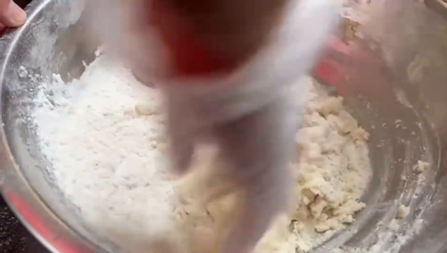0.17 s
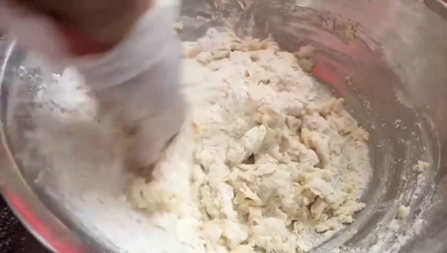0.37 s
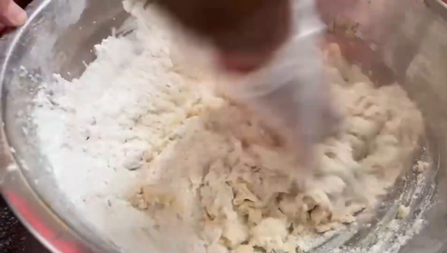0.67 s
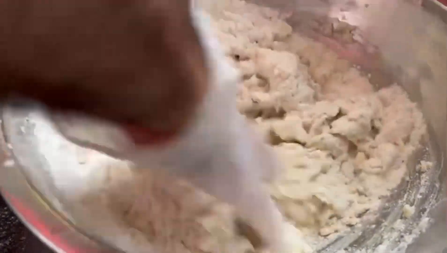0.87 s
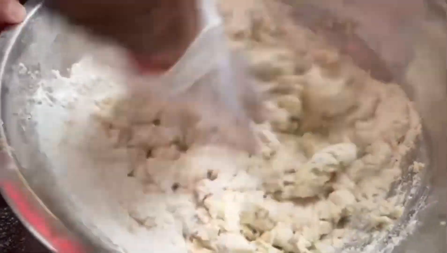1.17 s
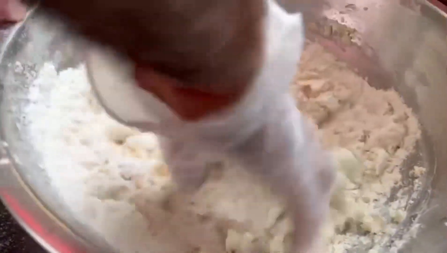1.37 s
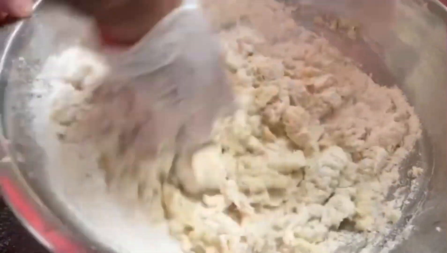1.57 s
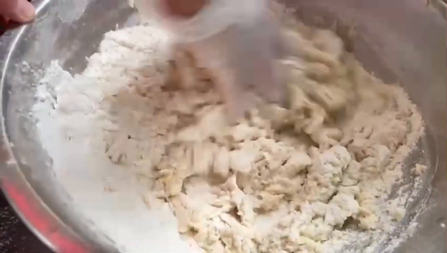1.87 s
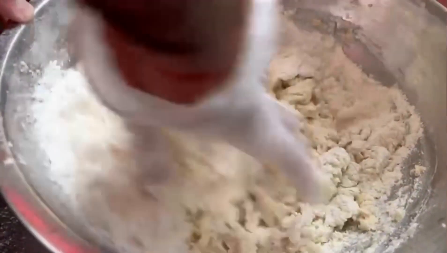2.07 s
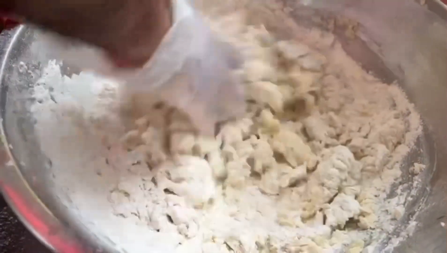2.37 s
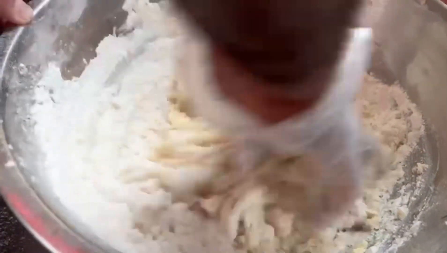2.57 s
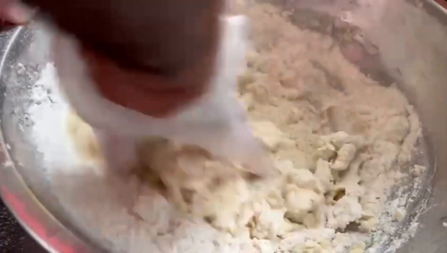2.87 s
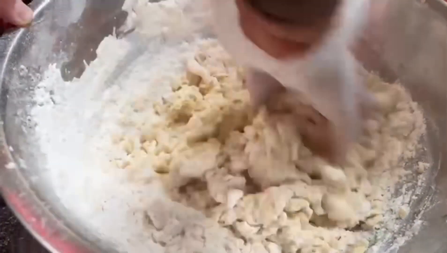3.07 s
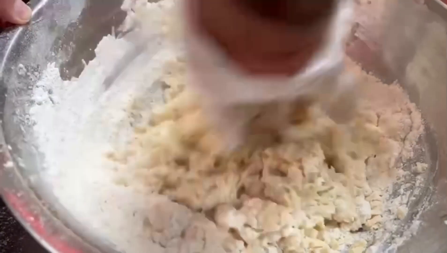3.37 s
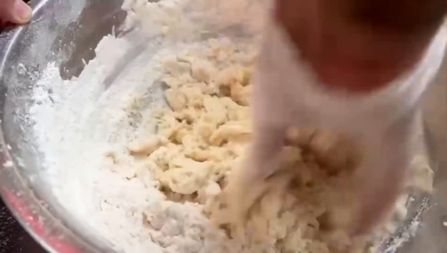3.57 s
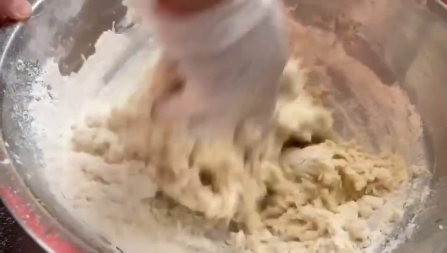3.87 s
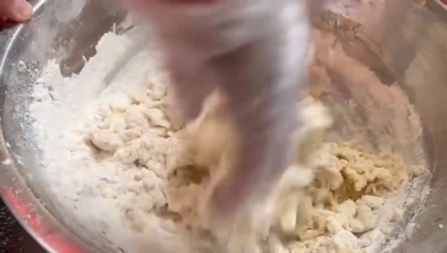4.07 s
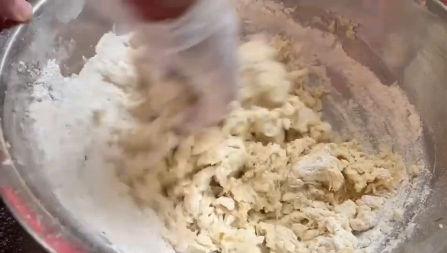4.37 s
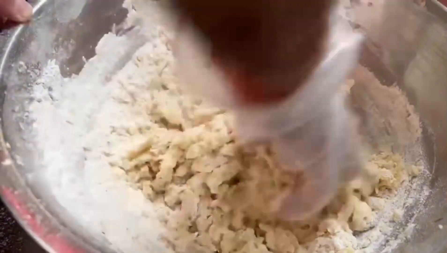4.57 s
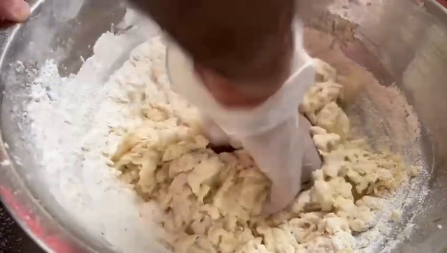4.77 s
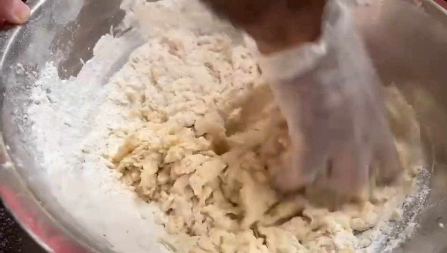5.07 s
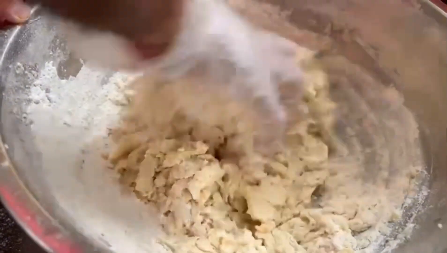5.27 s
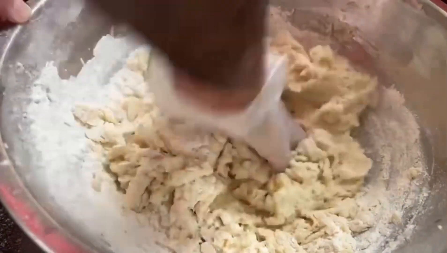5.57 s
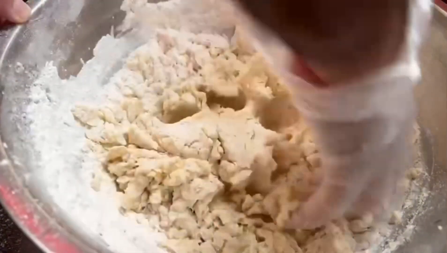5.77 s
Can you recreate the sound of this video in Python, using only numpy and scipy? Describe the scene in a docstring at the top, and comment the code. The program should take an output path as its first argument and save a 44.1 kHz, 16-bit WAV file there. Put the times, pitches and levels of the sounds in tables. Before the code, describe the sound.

A gloved hand mixes dough and flour in a steel bowl, with irregular rubbing, scraping and dull knocks over a faint hum.

```python
"""A gloved hand stirs flour and dough crumbs round a steel bowl, heard close up in stereo.
It opens on light touches and two tiny glove squeaks. From 0.7 s the fingers dig in, dragging lumps over
the wall; the damped steel taps and rings, and knuckles knock hard at 1.3 and 1.65 s. The stirring
goes on in a hiss of flour, lulls just after 4 s, then returns for a last run of strokes and knocks.
Mains hum and kitchen room tone lie underneath throughout."""
import sys
import numpy as np
from scipy import signal
from scipy.fft import rfft, irfft, next_fast_len
from scipy.io import wavfile
from scipy.ndimage import uniform_filter1d

SR = 44100
rng = np.random.default_rng(int(sys.argv[2]) if len(sys.argv) > 2 else 0)


def persist_wave(psi):
    """Save psi, clipped to +-1, as 16-bit WAV."""
    counts = np.round(np.clip(psi, -1, 1) * 32767).astype(np.int16)
    wavfile.write(sys.argv[1], SR, np.atleast_2d(counts).T)


N = 260190
STEP = 4  # rubbed modes ring at a quarter of the sample rate

# the bowl's modes in five groups, low to high: pitch_hz, rubbed_db, knocked_db, t60_s
SWAY_MODES = [(165, 0, -20, .35)]
BODY_MODES = [(226, -5, -6, .17), (258, -9, -20, .05), (298, 0, 0, .11), (345, -5, -14, .07)]
BELLY_MODES = [(462, 2, -13, .2), (519, -1, -20, .35), (594, -4, -24, .2)]
WALL_MODES = [(700, -8, -24, .07), (740, -1, -22, .1), (793, -4, -22, .35), (850, -14, -28, .05),
              (928, 2, -24, .12), (975, 2, -26, .09), (1040, 0, -26, .08)]
RIM_MODES = [(1150, -5, -34, .07), (1358, -1, -30, .04), (1506, 0, -31, .035), (1620, -1, -33, .03),
             (1795, -1, -30, .04), (2000, 2, -30, .045), (2070, -5, -32, .035), (2290, -10, -36, .02),
             (2530, -13, -38, .02), (3080, -11, -40, .02), (3600, -17, -40, .012)]
BOWL_MODES = SWAY_MODES + BODY_MODES + BELLY_MODES + WALL_MODES + RIM_MODES
# finger strokes over the wall: start_s, rise_s, hold_s, push_db, scrape_db, grit_db, jolt_db
FINGER_STROKES = [(0.179, 0.0031, 0.0061, -45, -86, -90, -47.5), (0.3, 0.039, 0.0091, -47, -56, -61.5, -79),
                  (0.686, 0.018, 0.0068, -35.5, -49, -59, -37), (0.805, 0.025, 0.011, -29, -30, -44, -28.5),
                  (0.877, 0.038, 0.092, -21, -23, -33.5, -60), (1.028, 0.03, 0.076, -20.5, -22.5, -36, -56),
                  (1.139, 0.049, 0.027, -25, -22.5, -39.5, -60),
                  (1.204, 0.041, 0.0021, -23.5, -18.5, -27, -47),
                  (1.305, 0.013, 0.008, -20.5, -23.5, -31.5, -58),
                  (1.421, 0.019, 0.022, -25.5, -27, -42.5, -60),
                  (1.526, 0.017, 0.0063, -29, -29.5, -41, -35.5), (1.59, 0.03, 0.035, -40, -39, -45.5, -60),
                  (1.646, 0.021, 0.0064, -22.5, -30, -35, -60), (1.754, 0.031, 0.041, -24, -27.5, -43, -56),
                  (1.812, 0.0037, 0.029, -24.5, -44, -61, -60),
                  (1.989, 0.022, 0.0062, -23.5, -27.5, -42.5, -24.5),
                  (2.135, 0.025, 0.012, -31.5, -39.5, -52.5, -54),
                  (2.286, 0.026, 0.057, -26, -43, -51, -32.5), (2.388, 0.07, 0.037, -28.5, -38, -51.5, -63),
                  (2.46, 0.028, 0.011, -25, -27.5, -42, -38), (2.554, 0.036, 0.033, -26.5, -32.5, -44, -52),
                  (2.741, 0.027, 0.037, -26.5, -33, -45, -30),
                  (2.795, 0.048, 0.035, -23.5, -33.5, -44.5, -60),
                  (2.908, 0.085, 0.013, -29.5, -27.5, -41, -60),
                  (3.029, 0.015, 0.015, -27, -31.5, -45.5, -60),
                  (3.157, 0.022, 0.091, -24, -31.5, -46, -38), (3.223, 0.02, 0.096, -39, -36, -49.5, -60),
                  (3.345, 0.05, 0.012, -24, -38.5, -46.5, -43),
                  (3.414, 0.019, 0.0096, -28.5, -38, -50.5, -65), (3.53, 0.046, 0.058, -41, -51, -69, -66),
                  (3.67, 0.025, 0.013, -26, -34, -48.5, -62),
                  (3.821, 0.03, 0.012, -21.5, -27.5, -36.5, -22),
                  (3.936, 0.032, 0.02, -50, -45.5, -64, -46), (3.965, 0.017, 0.081, -46.5, -54, -64.5, -73),
                  (4.018, 0.045, 0.011, -34.5, -48, -68, -85),
                  (4.146, 0.018, 0.063, -50.5, -62.5, -76, -81),
                  (4.536, 0.009, 0.083, -46, -55.5, -67.5, -74),
                  (4.665, 0.026, 0.022, -27, -34.5, -49, -51),
                  (4.703, 0.014, 0.0095, -20.5, -29, -41.5, -28),
                  (4.797, 0.0055, 0.023, -28, -33.5, -43.5, -57),
                  (4.855, 0.013, 0.025, -34.5, -50, -47, -63),
                  (4.897, 0.0061, 0.0094, -32, -33.5, -52, -36),
                  (5.071, 0.048, 0.0057, -28.5, -59, -56, -32.5),
                  (5.118, 0.049, 0.028, -39.5, -43.5, -62, -57),
                  (5.26, 0.051, 0.016, -24.5, -38.5, -43.5, -61),
                  (5.318, 0.017, 0.11, -49, -45.5, -65, -60),
                  (5.462, 0.015, 0.073, -34.5, -45.5, -57.5, -39),
                  (5.62, 0.019, 0.042, -25.5, -48, -48, -27),
                  (5.69, 0.013, 0.027, -35.5, -48.5, -53.5, -77)]


def rubbing():
    """Fingers drag dough round the bowl: push moves the low modes, scrape the wall, grit the rim."""
    # the counter under the bowl: pitch_hz, rubbed_db, knocked_db, t60_s
    counter_modes = [(69, 0, 0, 0.046)]
    jolt = jolts()
    force = stroke_force(push=1, fall_db_per_s=313, rest_db=-102) + amp(-7) * jolt
    out = stick_slip(force, BODY_MODES, wander_db=5, bend=0.02, top_hz=412,
                     place_db=hand_position_db(BODY_MODES, column=1, log_spread=0.23))
    force = stroke_force(push=1, gain_db=-26.5, fall_db_per_s=200, rest_db=-53.5)
    out += stick_slip(force, counter_modes, wander_db=0, bend=0.059, top_hz=200)
    force = stroke_force(push=1, gain_db=-14, fall_db_per_s=91, rest_db=-85)
    out += stick_slip(force, SWAY_MODES, wander_db=0, bend=0.0092, top_hz=310)
    force = stroke_force(push=0.85, scrape=0.3, gain_db=-7.5, fall_db_per_s=306, rest_db=-63.5)
    out += stick_slip(force + amp(-2.5) * jolt, BELLY_MODES, wander_db=8.3, bend=0.0097, top_hz=696)
    force = stroke_force(scrape=1, fall_db_per_s=320, rest_db=-77) + amp(-2) * jolt
    out += stick_slip(force, WALL_MODES, wander_db=4, bend=0.011, top_hz=984,
                      place_db=hand_position_db(WALL_MODES, column=2, log_spread=0.15))
    force = stroke_force(grit=1, fall_db_per_s=277, rest_db=-97) + amp(-19.5) * jolt
    return out + stick_slip(force, RIM_MODES, wander_db=4, bend=0.006, top_hz=3800)


def stick_slip(force, modes, wander_db, bend, top_hz, place_db=0):
    """Lumps stick and slip, ringing the modes with bumpy noise. The moving hand trades level among them,
    shifting dough bends their pitch, and the soft contact leaves little above top_hz."""
    force = (force * amp(1.58 * drift(20) + 1.05 * drift(150)))[::STEP]
    friction = force * rng.standard_normal((2, len(force)))
    shares = np.array([amp(db + wander_db * drift(8)[::STEP]) for _, db, _, _ in modes]) * amp(place_db)
    shares /= np.linalg.norm(shares, axis=0)
    ring = 0
    for (hz, _, _, t60), share in zip(modes, shares):
        pole = np.exp(-np.log(1000) / t60 * STEP / SR)
        bent_hz = hz * (1 + bend * drift(3.65)[::STEP])
        carrier = np.exp(2j * np.pi * np.cumsum(bent_hz) * STEP / SR)
        envelope = signal.lfilter([np.sqrt(2 - 2 * pole * pole)], [1, -pole], friction * share / carrier)
        ring = ring + (carrier * envelope).real
    ring = signal.sosfilt(signal.butter(3, top_hz, fs=SR / STEP, output="sos"), ring)
    # even out the loudest chance swells of the noisy ringing
    ring_power, force_power = (uniform_filter1d(x ** 2, size=400) + 1e-12 for x in (ring[0], force))
    ring *= np.minimum(force_power / ring_power, 1) ** 0.062
    return signal.resample_poly(ring, STEP, 1, axis=1)[:, :N]


def stroke_force(fall_db_per_s, rest_db, push=0, scrape=0, grit=0, gain_db=0):
    """Each stroke rises, holds and releases; push, scrape and grit weight its three levels."""
    rise_db = 11.5  # a stroke starts this far under its full force
    t = np.arange(0, N / SR + .002, .001)
    power = amp(rest_db) ** 2
    for start, rise, hold, push_db, scrape_db, grit_db, _ in FINGER_STROKES:
        rise = max(rise, .004)
        full_db = (push * push_db + scrape * scrape_db + grit * grit_db) / (push + scrape + grit)
        past_peak_s = t - start - rise
        under_db = np.maximum(-rise_db * past_peak_s / rise, fall_db_per_s * (past_peak_s - hold))
        power = power + amp(full_db + gain_db - np.maximum(under_db, 0)) ** 2
    return np.interp(np.arange(N) / SR, t, np.sqrt(power))


def jolts():
    """The fingers catch a lump as each stroke starts: a kick of force that fades fast."""
    out, t = np.zeros(N), np.arange(SR // 4) / SR
    for start, *_, jolt_db in FINGER_STROKES:
        add(out, start, amp(jolt_db) * np.exp(-t / 0.011) * attack(t, .001))
    return out


def hand_position_db(modes, column, log_spread):
    """Where the hand bears on the bowl decides which modes answer best; the rest lose up to 10.5 dB."""
    # pitches favoured as the hand travels: time_s, body_hz, wall_hz
    hand_path = [(0.66, 244, 730), (0.83, 270, 800), (0.89, 228, 804), (0.98, 282, 880), (1.05, 252, 770),
                 (1.25, 293, 910), (1.31, 265, 726), (1.46, 229, 747), (1.58, 280, 700), (1.76, 276, 960),
                 (1.95, 250, 715), (1.97, 308, 859), (2.05, 306, 815), (2.09, 236, 834), (2.15, 300, 780),
                 (2.26, 266, 726), (2.32, 310, 738), (2.41, 244, 745), (2.47, 280, 880), (2.54, 244, 780),
                 (2.61, 292, 780), (2.68, 262, 744), (2.84, 300, 750), (2.89, 270, 865), (3.06, 275, 725),
                 (3.16, 223, 760), (3.25, 287, 830), (3.54, 261, 710), (3.75, 290, 776), (3.78, 242, 724),
                 (3.85, 299, 801), (3.91, 302, 680), (3.98, 227, 780), (4.1, 231, 710), (4.48, 238, 828),
                 (4.53, 293, 744), (4.94, 330, 830), (5.03, 260, 790), (5.13, 283, 720), (5.23, 225, 786),
                 (5.29, 278, 750), (5.54, 240, 820), (5.57, 260, 740), (5.85, 233, 784)]
    path = np.array(hand_path)
    near_hz = np.interp(np.arange(0, N, STEP) / SR, path[:, 0], path[:, column])
    return [-10.5 * (1 - np.exp(-(np.log(hz / near_hz) / log_spread) ** 2)) for hz, *_ in modes]


def knuckle_knocks():
    """A short slap of glove on steel, then the soft blow rings the modes and thuds into the counter."""
    # knocks, with lifts for the sway mode, the modes of 200-240 Hz and those over 400 Hz:
    # start_s, blow_db, slap_db, thud_db, sway_lift_db, low_lift_db, high_lift_db, ring_ratio, pitch_ratio
    knocks = [(0.311, -31, -55, -34, 18.5, 12, 7, 0.36, 1.08), (1.25, -16, -45, -25, -5, 1, 0, 0.31, 0.87),
              (1.303, -4, -14, -20, -3.5, 3.5, -5.5, 1.7, 0.98),
              (1.542, -14, -50, -36, -22, -12, -17, 2.3, 0.99),
              (1.652, -2, -16, -22.5, -19, -19, -8.5, 0.5, 1.054),
              (1.68, -18.5, -45, -38, -10, 2, -6, 0.34, .97),
              (1.997, -19.5, -43, -35, -2, 9.5, 6, 0.68, 1.06),
              (2.978, -7.5, -28.5, -24.5, -10, -5.5, -25, 0.62, 1.076),
              (3.829, -21.5, -56, -43, 5, 8, 8, 1.4, 1),
              (3.857, -6, -24.5, -22, -15, -14, -1.5, 0.46, 1.064),
              (4.809, -16.5, -46, -45, -20, -18, 12, 0.59, 1.08),
              (5.198, -17.5, -50, -30, 30.5, 15, 8, 0.51, 0.97),
              (5.298, -4, -23, -24.5, -17, -2, -11.5, 1.43, 1)]
    # tone of the slap: frequency_hz, level_db
    slap_eq = [(400, -5), (800, 1), (1500, 5), (3000, -5), (6000, -6), (9000, -9), (11000, -13),
               (12500, -22)]
    out, t = np.zeros((2, N)), np.arange(SR // 2) / SR
    hz, _, mode_db, t60 = np.transpose(BOWL_MODES)[..., None]
    t60 = np.where(hz < 200, 0.88, t60)  # the hand hardly damps the sway mode
    thud_hz = 49 + (167 - 49) * np.exp(-t / 0.022)
    thud = np.sin(2 * np.pi * np.cumsum(thud_hz) / SR) * np.exp(-t / 0.026) * attack(t, .005)
    slap_t = t[:4096]
    slap_burst = np.exp(-(slap_t / .0045) ** 2) * (1 - np.exp(-(slap_t / .001) ** 2))
    slap_tail = 0.54 * np.exp(-slap_t / 0.012) * attack(slap_t, 0.0045)
    for start, blow_db, slap_db, thud_db, sway_db, low_db, high_db, ring_ratio, pitch_ratio in knocks:
        lift_db = np.select([hz < 200, hz < 240, hz > 400], [sway_db, low_db, min(high_db, 8)])
        envelopes = amp(mode_db + lift_db - 60 * t / (t60 * ring_ratio))
        loaded_hz = hz * pitch_ratio  # the load of dough retunes the bowl
        ring = (envelopes * np.sin(2 * np.pi * loaded_hz * t)).sum(0) * attack(t, 0.00098)
        add(out[0], start + .004, amp(blow_db) * ring / abs(ring).max())
        add(out[0], start + 0.0087, amp(thud_db) * thud)
        for row, noise in zip(out, shaped_noise(len(slap_t), slap_eq)):
            add(row, start, amp(slap_db) * noise * (slap_burst + slap_tail))
    return out


def bowl_rings():
    """Single rings of the bowl's modes near one pitch: some short taps, some lingering."""
    # rings: start_s, level_db, pitch_hz, log_spread (natural log of frequency), ring_ratio
    rings = [(0.9, -24, 745, .03, 1.8), (0.925, -15.5, 930, 0.037, 2), (0.971, -27, 2034, 0.025, 4.2),
             (1.072, -15.5, 715, 0.051, 1.2), (1.099, -13, 955, 0.047, 1.2), (1.222, -9.5, 950, 0.12, 0.61),
             (1.222, -20, 793, .03, .4), (1.238, -16.5, 2040, 0.018, 3), (1.41, -20.5, 226, .04, 3.1),
             (1.538, -22, 750, 0.18, 0.24), (1.701, -31, 165, .04, 0.53), (1.773, -26, 800, 0.24, 0.35),
             (2.29, -46, 700, .3, 0.27), (2.377, -33, 530, .2, 0.25), (2.487, -37.5, 2110, 0.02, 7.1),
             (2.762, -19.5, 740, 0.023, 2), (2.765, -19.5, 970, .05, 1.7), (2.772, -34.5, 1980, 0.045, 4.3),
             (3.889, -31, 165, 0.036, 3.8), (3.9, -42, 520, 0.037, 1.4), (4.006, -31, 226, .04, 3.4),
             (4.011, -44.5, 519, .03, 3.1), (4.04, -56, 740, 0.035, 2.3), (4.701, -24.5, 462, .04, 1.1),
             (4.71, -23.5, 740, .08, 0.72), (4.813, -17.5, 460, .1, 0.26), (4.906, -30, 740, 0.063, 0.76),
             (4.935, -41, 793, .02, 2.3), (5.118, -42, 515, 0.42, 0.61), (5.345, -35, 519, .03, 0.57),
             (5.687, -30, 1700, .25, 0.33), (5.688, -32, 3550, 0.11, 0.46)]
    out, t = np.zeros((2, N)), np.arange(SR // 3) / SR
    hz, mode_db, _, t60 = np.transpose(BOWL_MODES)[..., None]
    for start, level_db, pitch_hz, log_spread, ring_ratio in rings:
        nearness = np.exp(-(np.log(hz / pitch_hz) / max(log_spread, .02)) ** 2)
        envelopes = nearness * amp(mode_db - 60 * t / (ring_ratio * t60))
        ring = (envelopes * np.sin(2 * np.pi * hz * t)).sum(0) * attack(t, 0.0019)
        add(out[0], start, amp(level_db) * ring / abs(ring).max())
    return out


def flour_hiss():
    """Flour slides on steel and the glove rustles through it: fine, flickering noise in drifting clumps."""
    # tone of the flour: frequency_hz, level_db
    flour_eq = [(880, 0.5), (2000, -9), (3200, -8), (4200, -7), (5300, 0.5), (6500, -2.5), (8500, -3.5),
                (10000, -12), (12000, -7.5)]
    hz, _, spectra = signal.stft(rng.standard_normal((2, N)), SR, nperseg=256)
    clumps = uniform_filter1d(rng.standard_normal(spectra.shape[1:]), size=5, axis=0)
    clumps = unit_rms(uniform_filter1d(clumps, size=9, axis=1))
    spectra *= amp(curve_at(flour_eq, hz)[:, None] + 2.77 * clumps)
    powder = signal.istft(spectra, SR, nperseg=256)[1][:, :N]
    powder *= amp(0.87 * drift(30) + 0.84 * drift(500))
    force = stroke_force(scrape=0.29, grit=0.73, gain_db=-4, fall_db_per_s=415, rest_db=-68)
    on_steel = steel_sheen(powder) * (force + amp(-21) * jolts())
    loose = unit_rms(powder[:, ::-1]) * glove_sweeps()  # reversed, so the two layers are unrelated
    return on_steel + loose


def steel_sheen(noise):
    """The steel's high modes lift narrow peaks out of the sliding flour."""
    # high modes: pitch_hz, width_hz, lift_db
    peaks = [(2530, 28, 3), (3000, 55, 18.5), (3700, 37, 12), (4250, 53, 11), (4590, 50, 11.5),
             (5000, 49, 10.5), (5350, 52, 6.5), (5970, 54, 10.5), (6440, 79, 8), (7400, 85, 1),
             (7750, 44, 8), (9150, 61, 13)]
    bin_hz = np.fft.rfftfreq(N, 1 / SR)
    lift_db = sum(db / (1 + (2 * (bin_hz - hz) / width) ** 2) for hz, width, db in peaks)
    return unit_rms(irfft(rfft(noise) * amp(lift_db), N))


def glove_sweeps():
    """Each sweep of the glove through loose flour is a smooth swell in level."""
    # sweeps: middle_s, half_length_s, level_db
    sweeps = [(0.185, 0.016, -61), (0.34, 0.035, -58), (0.7, 0.031, -59), (0.438, 0.052, -51.5),
              (2, 0.092, -45), (2.875, 0.052, -46.5), (3.263, 0.03, -61), (3.73, 0.15, -46),
              (4.18, 0.016, -60), (4.358, 0.11, -53), (5.188, 0.062, -42.5), (5.534, 0.16, -51.5)]
    t = np.arange(N) / SR
    return sum(amp(db) * np.exp(-((t - middle) / half) ** 2) for middle, half, db in sweeps)


def glove_squeaks():
    """The plastic glove gives short, thin chirps."""
    # squeaks: start_s, level_db, pitch_hz
    squeaks = [(0.206, -52, 4850), (0.41, -62, 5900)]
    out, t = np.zeros((2, N)), np.arange(SR // 30) / SR
    envelope = np.exp(-(t / 0.0043 - 1.5) ** 2)
    for start, db, hz in squeaks:
        add(out[0], start, amp(db) * envelope * np.sin(2 * np.pi * hz * t))
    return out


def kitchen_reverb(sound):
    """The small kitchen answers with a short diffuse tail."""
    t60_s, predelay_s = 0.9, .006
    t = np.arange(SR // 3) / SR
    tail = rng.standard_normal((2, len(t))) * amp(-60 * t / t60_s) * (t > predelay_s)
    return signal.oaconvolve(sound, tail / np.linalg.norm(tail[0]), axes=1)[:, :N]


def room_tone():
    """Low room noise whose level flutters."""
    # tone of the room: frequency_hz, level_db
    room_eq = [(12, -63), (25, -18), (60, 3.5), (130, -2), (330, -6), (520, -24.5), (1080, -18.5),
               (3000, -32), (5000, -33.5), (9000, -30), (12000, -38.5)]
    return shaped_noise(N, room_eq) * amp(-53 + 3.8 * drift(16))


def mains_hum():
    """One low mains tone that wavers a little in pitch and level."""
    pitch_hz = 118.7 * (1 + 0.011 * drift(6.6))
    hum = np.sqrt(2) * amp(-48 + 0.5 * drift(3.6)) * np.sin(2 * np.pi * np.cumsum(pitch_hz) / SR)
    return hum * [[1], [0]]


def amp(db):
    return 10 ** (np.asarray(db) / 20)


def unit_rms(x):
    return x / np.sqrt(np.mean(x ** 2) + 1e-20)


def attack(t, rise_s):
    return 1 - np.exp(-t / rise_s)


def add(mix, start_s, sound):
    part = mix[round(start_s * SR):][:len(sound)]
    part += sound[:len(part)]


def curve_at(points, hz):
    """Reads a curve along a log frequency axis."""
    point_hz, values = np.transpose(points)
    return np.interp(np.log(hz + 1), np.log(point_hz + 1), values)


def shaped_noise(length, eq):
    """Two rows of noise through an EQ curve, at rms 1."""
    gain = amp(curve_at(eq, np.fft.rfftfreq(length, 1 / SR)))
    return unit_rms(irfft(rfft(rng.standard_normal((2, length))) * gain, length))


def drift(top_hz):
    """Random wander of about rms 1, mostly slower than top_hz."""
    width = max(int(SR / 64 / top_hz / 2), 1)
    steps = unit_rms(uniform_filter1d(rng.standard_normal(N // 64 + 2), width))
    return np.interp(np.arange(N), np.arange(len(steps)) * 64, steps)


def scene():
    """The bowl in its kitchen. Row 0 reaches both sides; row 1 is scattered sound for the right only."""
    bowl = rubbing() + flour_hiss() + knuckle_knocks() + bowl_rings() + glove_squeaks()
    return bowl + amp(-21.5) * kitchen_reverb(bowl) + room_tone() + mains_hum()


def record(dry):
    """Stereo width, balance and phase vary with frequency; then a soft clip and a band limit."""
    # how alike left and right sound: frequency_hz, coherence (0-1)
    likeness = [(25, .8), (60, .96), (150, .9), (300, .98), (500, .9), (800, .8), (1100, .35), (2000, .68),
                (5500, .55), (7500, .8), (11500, .99)]
    # balance: frequency_hz, left_minus_right_db
    balance = [(200, 0), (280, 3.8), (700, 3), (1100, 4.7), (5500, 5), (7500, 0)]
    # phase of left against right, opposite from about 9.4 to 11 kHz: frequency_hz, left_lead_turns
    left_lead = [(150, 0), (780, .07), (1080, .48), (1300, .9), (1550, .75), (2100, .95), (2600, 1.15),
                 (4300, 1.05), (5100, 1.17), (6000, 1), (8900, 1), (9400, .5), (10900, .5), (11300, 0)]
    size = next_fast_len(N + 4096)
    hz = np.fft.rfftfreq(size, 1 / SR)
    direct, scattered = rfft(dry, size)
    coherence = curve_at(likeness, hz)
    right = coherence * direct + np.sqrt(1 - coherence ** 2) * scattered
    right *= np.exp(-2j * np.pi * curve_at(left_lead, hz))
    tilt = amp(curve_at(balance, hz) / 2)
    stereo = irfft(np.array([direct * tilt, right / tilt]), size)[:, :N]
    stereo = 1.3 * np.tanh(stereo / 1.3)  # the input stage rounds off the hardest knocks
    lowpass = signal.firwin(511, 11950, window=("kaiser", 9), fs=SR)
    return signal.oaconvolve(stereo, lowpass[None], "same")


dry = scene()
out = record(dry)
persist_wave(out)
```